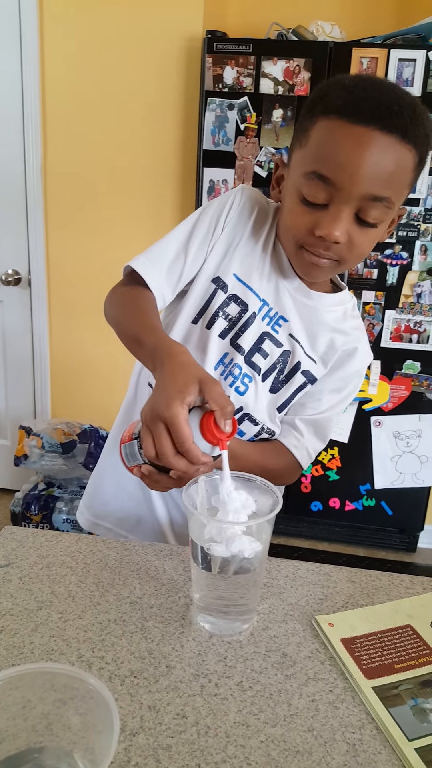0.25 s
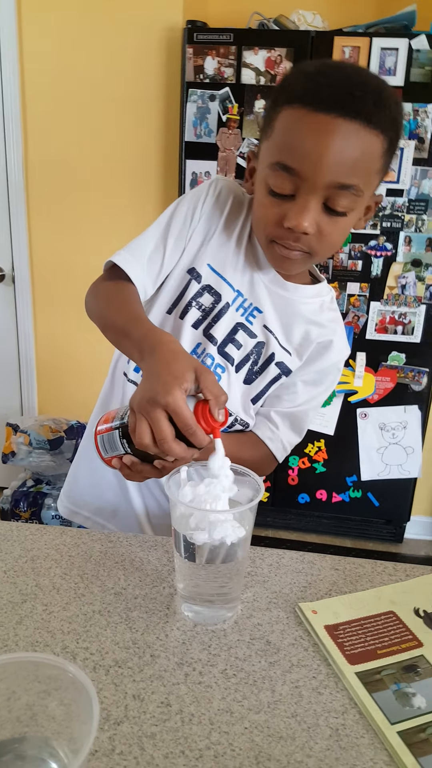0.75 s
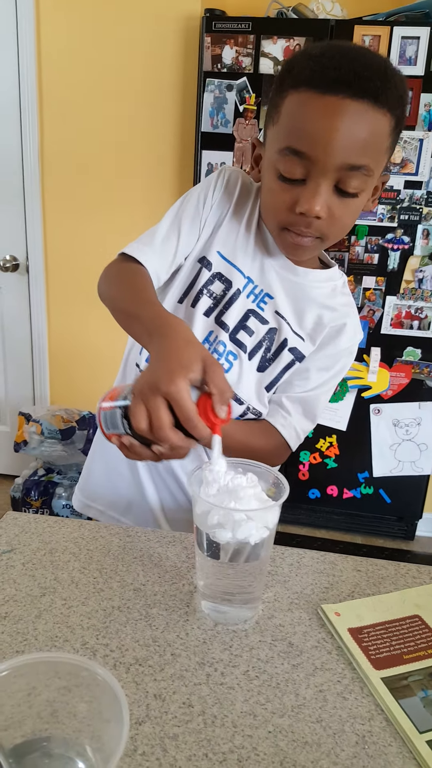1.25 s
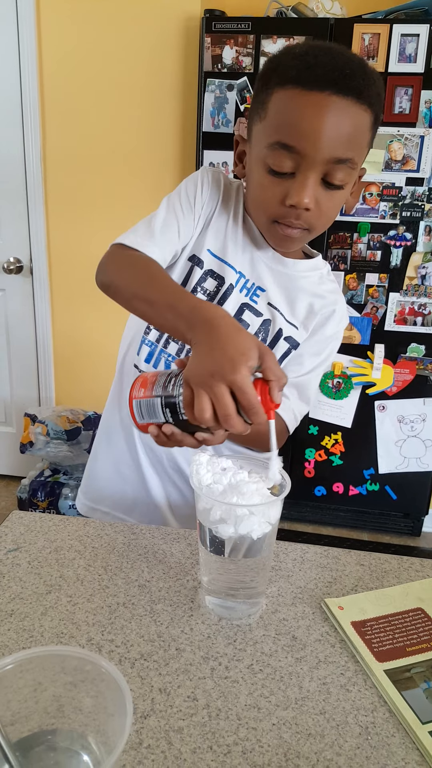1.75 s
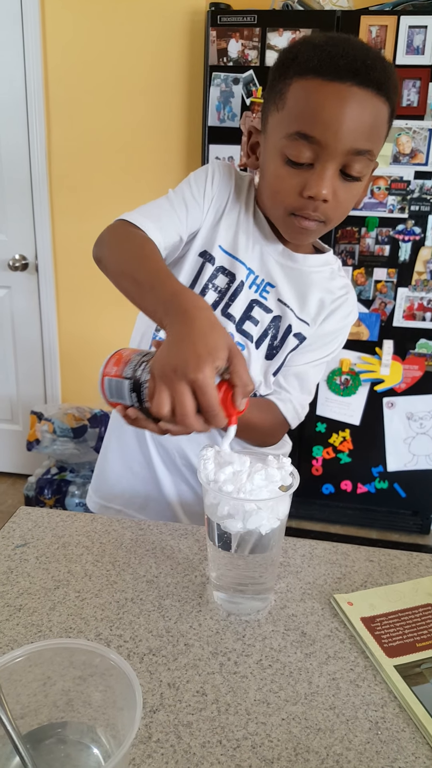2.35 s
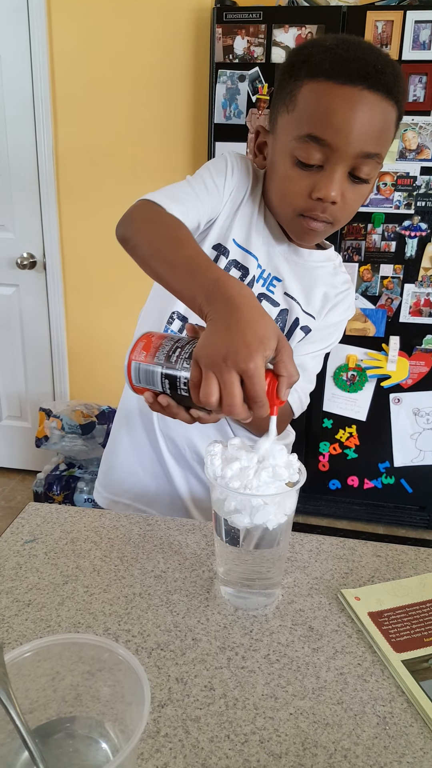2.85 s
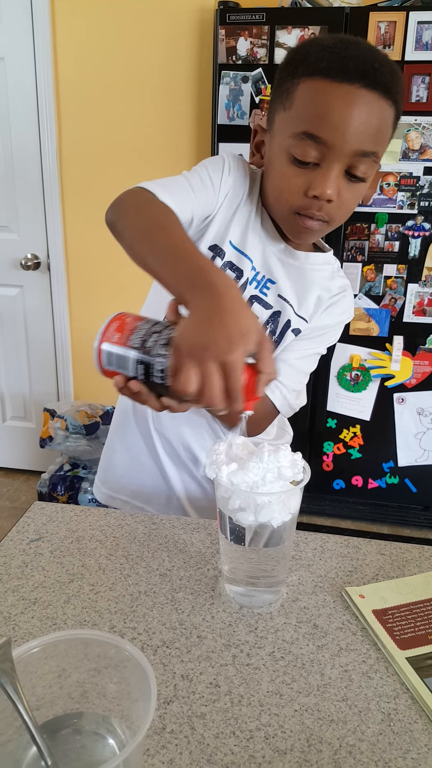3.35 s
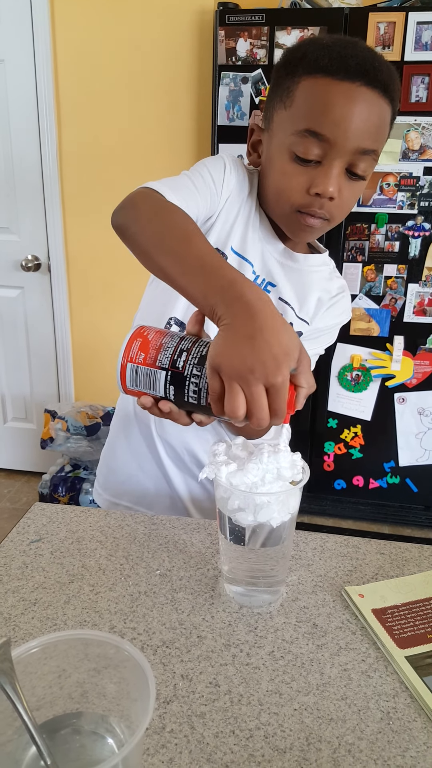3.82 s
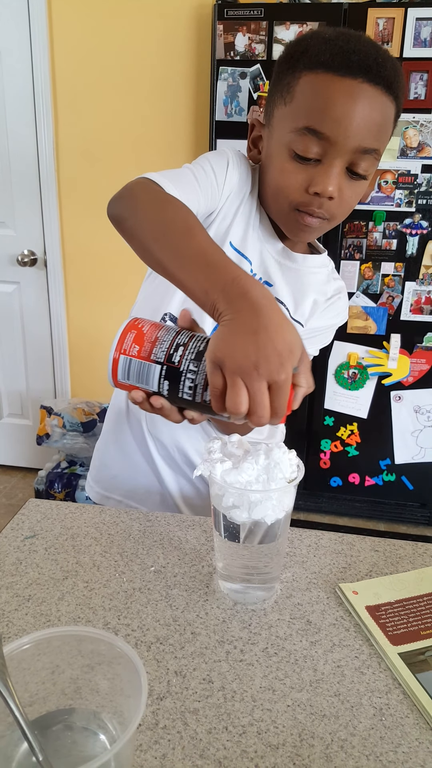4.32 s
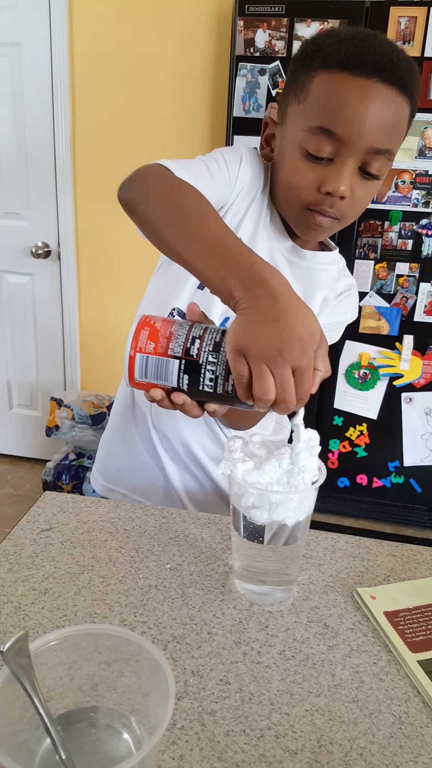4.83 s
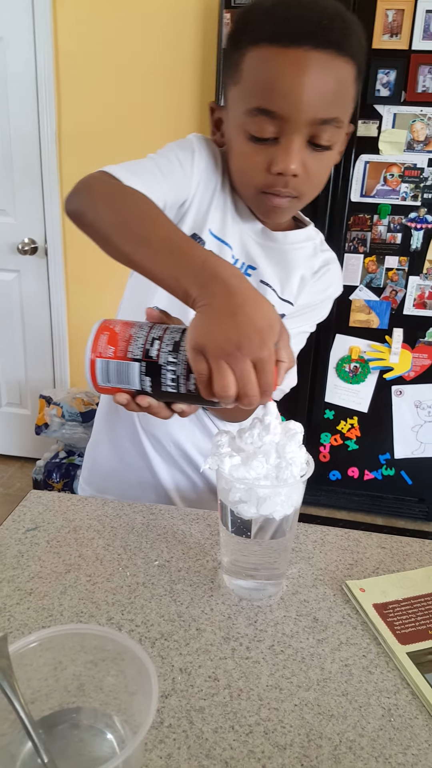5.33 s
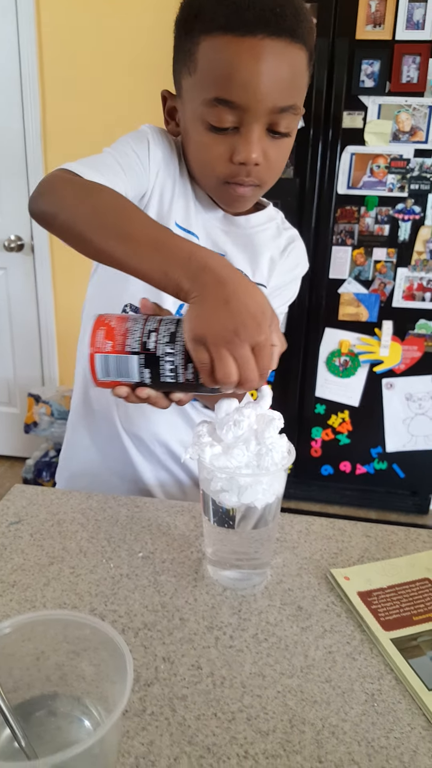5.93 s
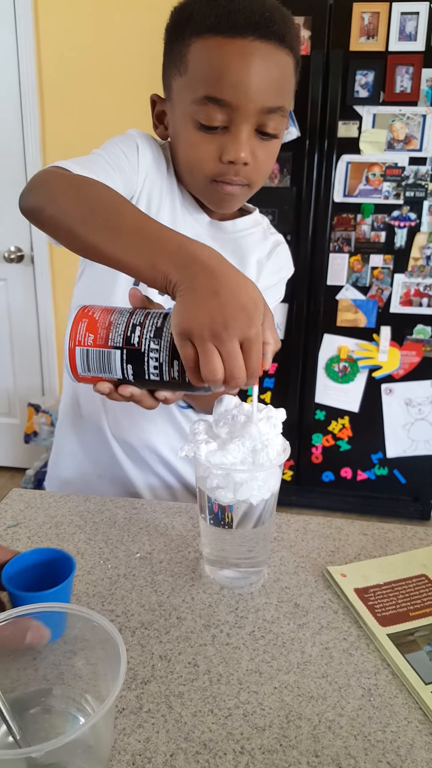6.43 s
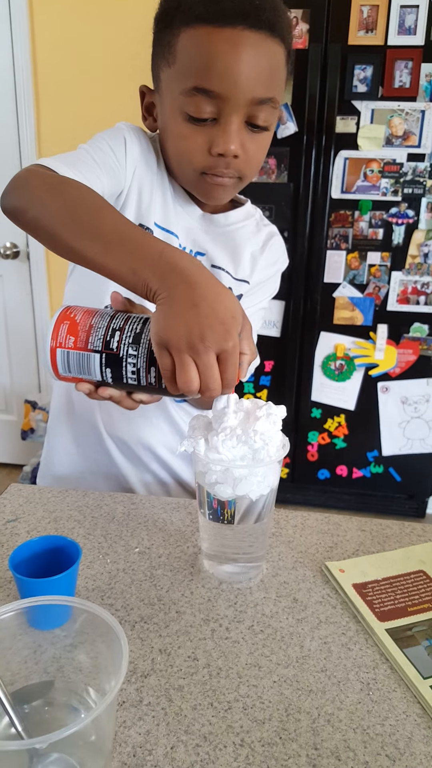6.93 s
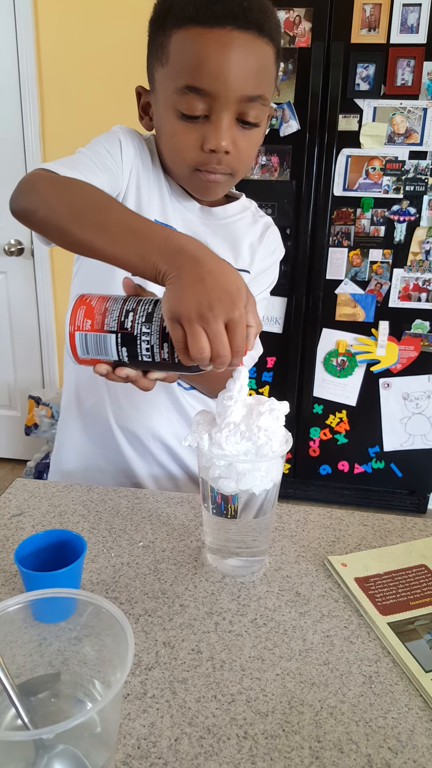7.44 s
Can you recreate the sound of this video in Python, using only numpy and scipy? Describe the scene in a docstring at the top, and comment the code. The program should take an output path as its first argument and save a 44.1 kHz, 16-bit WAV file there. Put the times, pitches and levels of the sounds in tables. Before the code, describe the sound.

A phone at arm's length hears foam spraying steadily into a cup on a stone counter: sputtering hiss, small gas bursts, hollow gurgle. After a brief dip and a drier, gassier stretch in the middle, wet foam returns abruptly. Near the end the jet flares twice while a small plastic cup is softly set down nearby. Low refrigerator rumble and short room reflections surround it.

```python
"""An aerosol can sprays foam into a plastic cup on a stone counter, an arm's length from an upright phone.
From the start flow noise sputters with bursting gas pockets; a higher cup ring joins after 1 s.
At 3.3 s the tilted can turns dry and bright, at 4.2 s foam returns at once.
From 5 s decaying modes and thuds set a small cup down nearby; the jet flares at 3.3, 6.1 and 6.7 s.
Throughout, a refrigerator hums as resonant noise, and counter and walls answer with delays and noise tails."""
import sys
import numpy as np
from scipy import signal
from scipy.fft import rfft, irfft, next_fast_len
from scipy.io import wavfile
from scipy.ndimage import uniform_filter1d, map_coordinates

SR = 44100
rng = np.random.default_rng(int(sys.argv[2]) if len(sys.argv) > 2 else 0)


def inscribe(sig):
    """Save sig as 16-bit PCM at rate SR to the path in sys.argv[1].

    A 1-D sig is mono; a 2-D sig holds one channel per row.
    Samples are clipped to [-1, 1] before scaling.
    """
    pcm = np.round(np.clip(np.atleast_2d(sig).T, -1, 1) * 32767)
    wavfile.write(sys.argv[1], SR, pcm.astype(np.int16))


N = 338688

# Flow, used as departure from each column's mean: (time [s], foam [dB], escaping gas [dB])
FLOW = [(0, -33.5, -40), (.13, -35, -42), (1.0, -31.5, -45), (1.11, -33, -41), (2.01, -33.5, -42),
        (2.19, -37, -45), (2.26, -43, -50.5), (2.43, -42, -50.5), (2.47, -42.5, -45.5),
        (2.72, -35.5, -40.5), (2.9, -33.5, -39), (3.08, -31.5, -48.5), (3.27, -34.5, -42),
        (3.32, -30.5, -36), (3.46, -32, -37.5), (3.66, -35.5, -38.5), (3.85, -34, -39), (4.0, -36.5, -37.5),
        (4.15, -35, -37), (4.24, -31, -38.5), (4.27, -32.5, -41.5), (4.4, -32, -40), (5.28, -32.5, -43),
        (5.45, -28.5, -49), (5.56, -30.5, -48), (5.64, -34, -43.5), (6.18, -31.5, -50.5),
        (6.29, -32.5, -43.5), (6.67, -32.5, -45.5), (6.74, -30, -47.5), (7.04, -32.5, -44.5),
        (7.29, -31.5, -53), (7.5, -33.5, -50), (7.68, -35.5, -52)]
# Largest gas pockets: (time [s], relative level [dB], gas spit re pocket [dB])
POCKETS = [(1.8313, -22.5, -16), (2.452, -29, -18), (3.3543, -34, -16), (4.4987, -26, -12),
           (6.1947, -20, -27.5), (1.4401, -22, -39), (2.033, -30, -5), (3.018, -18.5, -38),
           (3.259, -23, -15), (3.311, -21, -14), (3.923, -23, -15), (4.028, -17, -21), (4.1935, -20, -20),
           (4.386, -26.5, -6), (5.0408, -20, -26), (6.122, -22, -20), (6.549, -18.5, -32),
           (6.729, -19.5, -33), (7.2, -21, -42)]

# Relative spectra of the flow layers, each: (frequency [Hz], density [dB])
GURGLE_SPECTRUM = [(180, -46.5), (300, -19.5), (533, -14.5), (710, -14), (767, -11), (1470, -1.5),
                   (1600, -8), (2080, -52.5), (3520, -120)]
# Air column over the foam: (frequency [Hz], density [dB])
RING_SPECTRUM = [(1000, -29.5), (1400, -8.5), (1720, -4), (1950, -5.5), (2600, -16.5), (5000, -75.5)]
# Wet spray: (frequency [Hz], density [dB])
SPRAY_SPECTRUM = [(1200, -30.5), (1900, -5.5), (2280, -5), (2500, -7), (2900, -3.5), (3300, -5.5),
                  (5000, -45)]
# Jet: (frequency [Hz], density [dB])
JET_SPECTRUM = [(2500, -33.5), (3450, 0.5), (4200, -8), (4900, -8), (5400, -0.5), (8000, -47.5)]
# Dry gas: (frequency [Hz], density [dB])
GAS_SPECTRUM = [(3500, -60.5), (5350, 0), (5850, 8.5), (7200, -0.5), (8600, -3), (9900, -10.5),
                (16000, -36)]
# Orifice whistle and finest hiss: (frequency [Hz], density [dB])
FINE_SPECTRUM = [(6000, -37), (7700, 3.5), (8250, -6.5), (9000, -7), (10000, -10.5), (11600, -11),
                 (13700, -7), (16000, -13)]
# Second, higher ring of the air in the cup: (frequency [Hz], density [dB])
UPPER_SPECTRUM = [(1700, -57.5), (2120, -0.5), (2280, 0), (2420, -5.5), (3000, -48.5)]
SPECTRA = (GURGLE_SPECTRUM, RING_SPECTRUM, SPRAY_SPECTRUM, JET_SPECTRUM,
           GAS_SPECTRUM, FINE_SPECTRUM, UPPER_SPECTRUM)
# Layer balance, rows in the order of SPECTRA: (usual level [dB], foam slope [dB/dB],
# gas slope [dB/dB], change while dry [dB], change as the cup fills [dB/s])
LAYER_BALANCE = [(-41.5, 0.42, 0, -9.5, -.5), (-40.5, 0.7, -0.1, -8.5, 0.46), (-39, 0.91, 0.04, 2, 0.14),
                 (-40, 0.53, 0.35, 0, 0.19), (-42.5, 0.2, 0.95, -3, 0.27), (-44, 0.47, 1.31, 4.5, 1.15),
                 (-42, 1, -0.26, -10, 0)]
# Same order: flow unevenness [1], direct pocket share [1]
ROUGHNESS = (0.57, 0.56, 0.94, 1.43, 1.64, 1.67, 0.71)
POCKET_SHARE = (0.38, 0.59, 0.46, 0.38, 0.26, 0.17, 0.46)
# Air spaces near the nozzle: (frequency [Hz], width [Hz], height [dB])
AIR_SPACES = [(620, 18, 4), (713.5, 13, 8.5), (909.6, 31, 11), (1114, 48, 2.5), (8210, 190, 9)]
# Jet flares: (time [s], nominal rise [dB])
JET_FLARES = [(3.31, 3.5), (6.14, 8.5), (6.72, 9)]
# Jet's brightest band, moving as the can turns: (time [s], centre [Hz], height [dB])
JET_BAND = [(0, 4320, 2), (.85, 4450, 8), (1.15, 4350, 4), (1.4, 4880, 8), (1.7, 4300, 4), (2.15, 4300, 3),
            (2.3, 4670, 11), (2.7, 4700, 6), (3.1, 4250, 6), (3.42, 4090, 7.5), (4.4, 4400, 5.5),
            (6.05, 4150, 5), (6.17, 4650, 5), (6.5, 4140, 2), (6.95, 5070, 4), (7.2, 4480, 5.5),
            (7.68, 4200, -0.5)]
# Cup ring, moving as foam fills it: (time [s], centre [Hz], height [dB])
RING_BAND = [(0, 1330, 4), (.9, 1800, 3.5), (1.4, 1540, 4.5), (2.1, 1760, 3), (5.7, 1710, 4),
             (7.68, 1720, 6.5)]

# Contacts on the counter: (time [s], relative level [dB], thud re contact [dB], softness cut [Hz])
CONTACTS = [(5.036, -23, -32, 750), (6.1361, -21.5, -27, 5000), (6.219, -37, -7, 3000),
            (6.588, -34, -10, 3000)]
# Small cup's modes: (frequency [Hz], relative level [dB], t60 [s])
CUP_MODES = [(220, -13, .03), (400, -10, .03), (600, -3, .035), (788, -1, .05), (865, 0, .05),
             (1107, 7, .06), (1560, 4, .05), (2530, 0, .025)]

# Counter bounce as the can rises and sinks: (time [s], nominal delay [ms], strength [0-1])
COUNTER_BOUNCE = [(0, 0.46, 0.68), (1.35, 0.47, 0.8), (2.6, 0.46, 0.77), (4.0, 0.48, 1), (4.6, 0.47, 1),
                  (5.3, 0.491, 0.87), (5.8, 0.47, 0.89), (7.68, 0.47, 0.99)]
# Cancellations with the bounce: (cycles per nominal delay [1], width [Hz], gain at full strength [dB])
BOUNCE_NOTCHES = [(1.57, 200, -9), (2.47, 250, -8), (3.6, 200, -3), (4.5, 250, -7)]
# Room decay: (frequency [Hz], t60 [s])
ROOM_DECAY = [(300, 0.54), (2000, 0.44), (10000, 0.24)]
# Refrigerator rumble: (frequency [Hz], relative density [dB])
RUMBLE_SPECTRUM = [(15, -28), (40, -22), (97, -20), (140, -4.5), (220, -4.5), (360, -8), (950, -16),
                   (1500, -31), (2600, -70)]
# Cabinet resonances: (frequency [Hz], width [Hz], height [dB])
CABINET = [(76.4, 5.7, 13), (120.7, 2, 11.5), (231, 5.7, 9.5)]
# Rumble's left-right likeness: (frequency [Hz], correlation [1])
LIKENESS = [(60, 1), (250, 0.92), (600, 1), (1200, 0.17)]
# Port colour: (frequency [Hz], left minus right [dB])
PORT_DIFFERENCE = [(100, -0.5), (300, -0.5), (700, -1), (1300, 1.5), (2100, 2), (2900, 2), (4300, -9),
                   (5500, -5), (7000, 1), (8300, -6.5), (9300, -7.5), (11000, -5), (15000, -7)]

DRY_FROM_S, DRY_FULL_S, DRY_UNTIL_S, REWET_S = 3.27, 3.66, 4.225, 0.025
SURGE_RISE_S, SURGE_FADE_S = 0.0028, 0.11  # time constants
UPPER_FROM_S, UPPER_UNTIL_S, UPPER_FADE_S, UPPER_OFF_DB = 1.14, 5.8, 0.18, -22
LARGEST_POCKET, DRY_CALM, PATCHINESS_DB = 3.7, 0.3, 1.1
POP_RING_DB, POP_RING_FOLLOWS_DB_PER_DB = 9, 0.72
JET_BAND_WIDTH_HZ, RING_BAND_WIDTH_HZ = 600, 280
UPPER_DELAY_RATIO, LOWER_DELAY_RATIO, UPPER_STRENGTH_RATIO = 1.445, 0.919, 0.51
KNOCK_ROOM_DB, WALLS_DB = -12, -5.5
HUM_START_DB, HUM_RISE_DB_PER_S = -55, 0.5
TOP_HZ = 15780


def amp(db):
    """Gain of a level in dB."""
    return 10 ** (np.asarray(db) / 20)


def unit(x):
    """x at rms 1."""
    return x / np.sqrt(np.mean(x ** 2) + 1e-20)


def along(points, hz):
    """(Hz, value) points interpolated on a log axis."""
    f, v = np.transpose(points)
    return np.interp(np.log(hz + 1), np.log(f + 1), v)


def curves(rows):
    """One value per sample for each column after the time."""
    s, *cols = np.transpose(rows)
    return [np.interp(np.arange(N) / SR, s, c) for c in cols]


def wobble(knots_per_s):
    """A smooth random curve."""
    return map_coordinates(rng.standard_normal(N // 100), [np.arange(N) * knots_per_s / SR], order=2)


def filtered(x, response):
    """x times a complex response of frequency."""
    m = next_fast_len(N + SR // 2)
    return irfft(rfft(x, m) * response(np.fft.rfftfreq(m, 1 / SR)), m)[..., :N]


def coloured(x, gain, size=4096):
    """x through the minimum-phase filter with this gain of frequency."""
    cepstrum = irfft(np.log(gain(np.fft.rfftfreq(size, 1 / SR)) + 1e-6))
    cepstrum[1:size // 2] *= 2  # fold onto positive time: causal
    cepstrum[size // 2 + 1:] = 0
    return signal.oaconvolve(x, irfft(np.exp(rfft(cepstrum))))[:N]


def peaks(modes, hz):
    """Gain 1 with resonance humps added in power."""
    humps = sum(amp(2 * db) / (1 + (2 * (hz - c) / width) ** 2) for c, width, db in modes)
    return np.sqrt(1 + humps)


def drifting(x, depth_db, bins, frames):
    """Random humps and dips of colour, smoothed over frequency bins and time frames."""
    z = signal.stft(x, nperseg=256)[2]
    field = uniform_filter1d(rng.standard_normal(z.shape), bins, 0)
    for _ in range(2):
        field = uniform_filter1d(field, frames, 1)
    return signal.istft(z * amp(depth_db * unit(field)), nperseg=256)[1][:N]


def nozzle():
    """Turbulent flow, choked on and off by foam, with bursting gas pockets on top."""
    levels_db = voices()
    calm = 1 - DRY_CALM * dryness()  # gas alone flows more evenly
    shared = sputter(per_s=500, spread_db=1.5)
    puff = amp(-60 * np.arange(SR // 50) / SR / 0.0066)  # each burst lets a short puff of gas through
    layers = 0
    for level_db, spectrum, rough, share in zip(levels_db, SPECTRA, ROUGHNESS, POCKET_SHARE):
        pockets = unit(0.73 * shared + sputter(per_s=600, spread_db=3.0))
        flush = unit(signal.oaconvolve(pockets, puff)[:N])
        choke = 0.49 * rough * wobble(14) + 0.69 * wobble(60) + 1.25 * wobble(250)
        flow = unit(amp(calm * rough * choke) * (0.6 + rough * flush) * rng.standard_normal(N))
        gain = lambda hz: amp(along(spectrum, hz)) * peaks(AIR_SPACES, hz)
        layers = layers + amp(level_db) * unit(coloured(flow + share * pockets, gain))
    # random fast flicker of level across frequency
    flickering = drifting(layers, PATCHINESS_DB, bins=6, frames=2)
    return flickering + pops(ring_level_db=levels_db[1])


def voices():
    """Layer levels: foam and gas drive them; the dry spell and the filling cup shift the balance."""
    t = np.arange(N) / SR
    foam_db, gas_db = [c - c.mean() for c in curves(FLOW)]
    dry = dryness()
    gurgle, ring, spray, jet, gas, fine, upper = [
        usual_db + by_foam * foam_db + by_gas * gas_db + dry_db * dry + fill_db_per_s * (t - t.mean())
        for usual_db, by_foam, by_gas, dry_db, fill_db_per_s in LAYER_BALANCE]
    for s, rise_db in JET_FLARES:
        since = np.clip(t - s, 0, None)
        jet = jet + rise_db * (1 - np.exp(-since / SURGE_RISE_S)) * np.exp(-since / SURGE_FADE_S)
    # the upper ring sounds until the foam heaps over the rim
    inside_s = np.minimum(t - UPPER_FROM_S, UPPER_UNTIL_S - t)
    sounding = np.clip(inside_s / UPPER_FADE_S + 0.5, 0, 1)
    return gurgle, ring, spray, jet, gas, fine, upper + UPPER_OFF_DB * (1 - sounding)


def dryness():
    """0 while foam flows, 1 while the tilted can draws mostly gas."""
    times_s = [DRY_FROM_S, DRY_FULL_S, DRY_UNTIL_S, DRY_UNTIL_S + REWET_S]
    return np.interp(np.arange(N) / SR, times_s, [0, 1, 1, 0])


def sputter(per_s, spread_db):
    """Gas pockets bursting at random moments, few large and many small."""
    size = -np.log(rng.random(N) * SR / per_s + 1e-9)  # above zero: a burst, exponentially sized
    return unit((size > 0) * amp(spread_db * np.clip(size, 0, LARGEST_POCKET)))


def pops(ring_level_db):
    """Largest pockets: one push into the spray and the cup, and a decaying spit of gas."""
    push, ring, spit = np.zeros(N), np.zeros(N), np.zeros(N + SR)
    t = np.arange(SR // 50) / SR
    for s, db, spit_db in POCKETS:
        at = round(s * SR)
        push[at] = amp(db)
        # the cup rings more when the flow rings it
        ring[at] = amp(db + POP_RING_FOLLOWS_DB_PER_DB * (ring_level_db[at] - ring_level_db.mean()))
        spit[at:][:len(t)] += amp(db + spit_db - 60 * t / 0.0069) * rng.standard_normal(len(t))

    def shaped(x, db, *spectra):
        """x with the summed gains of the spectra, raised by db."""
        return amp(db) * coloured(x, lambda hz: sum(amp(along(each, hz)) for each in spectra))

    return (shaped(push, 24.9, SPRAY_SPECTRUM, JET_SPECTRUM) + shaped(ring, POP_RING_DB, RING_SPECTRUM)
            + shaped(spit[:N], 16.0, GAS_SPECTRUM, FINE_SPECTRUM))


def knocks():
    """Each contact rings the decaying modes of a plastic cup and thuds the counter."""
    out, t = np.zeros(N + SR), np.arange(SR // 4) / SR
    for s, db, thud_db, soft_hz in CONTACTS:
        ring = 0
        for k, (hz, level_db, t60_s) in enumerate(CUP_MODES):
            decay = amp(level_db + rng.normal(0, 1.0) - 60 * t / t60_s)
            softness = 1 / (1 + (hz / soft_hz) ** 4)  # a soft contact excites less treble
            ring = ring + (-1) ** k * decay * np.sin(2 * np.pi * hz * t) * softness
        ring = ring * (1 - np.exp(-t / 0.0004))
        thud = amp(-60 * t / 0.18) * np.sin(2 * np.pi * 75 * t) * (1 - np.exp(-t / 0.0082))
        out[round(s * SR):][:len(t)] += amp(db + thud_db - 1) * thud - amp(db - 4) * ring
    return out[:N]


def wandering(x):
    """Moving bands: the jet's peak, the cup's ring, and the notches that follow the bounce."""
    hz, t, z = signal.stft(x, SR, nperseg=512)
    at = np.clip(t * SR, 0, N - 1).astype(int)
    bell = lambda centre_hz, width_hz: 1 / (1 + (2 * (hz[:, None] - centre_hz) / width_hz) ** 2)
    delay_ms, strength = [c[at] for c in curves(COUNTER_BOUNCE)]
    jet_hz, jet_db = [c[at] for c in curves(JET_BAND)]
    ring_hz, ring_db = [c[at] for c in curves(RING_BAND)]
    db = jet_db * bell(jet_hz, JET_BAND_WIDTH_HZ) + ring_db * bell(ring_hz, RING_BAND_WIDTH_HZ)
    for cycles, width_hz, depth_db in BOUNCE_NOTCHES:
        db = db + depth_db * strength * bell(1e3 * cycles / delay_ms, width_hz)
    return signal.istft(z * amp(db), SR, nperseg=512)[1][..., :N]


def paths(x):
    """The lower port hears the bounce close behind the direct sound, the upper port later and weaker."""
    def late(hz, delay_s, dull_hz):
        """Delayed path; bounces scatter their treble."""
        return np.exp(-2j * np.pi * hz * delay_s) / np.sqrt(1 + (hz / dull_hz) ** 4)

    direct = lambda hz: late(hz, 0.000016, 30000)
    upper = lambda hz: 1 + 0.26 * late(hz, 0.001714, 2200)
    lower = lambda hz: 0.82 * direct(hz) + 0.091 * late(hz, 0.00299, 3400)
    delay_ms, strength = curves(COUNTER_BOUNCE)
    off_counter = filtered(x, lambda hz: direct(hz) / np.sqrt(1 + (hz / 8000) ** 4))

    def bounce(delay_ratio):
        """Counter reflection with a moving delay."""
        read_at = np.arange(N) - delay_ratio * delay_ms * SR / 1e3
        return strength * map_coordinates(off_counter, [read_at], order=3)

    ports = filtered(x, lambda hz: np.array([upper(hz), lower(hz)]))
    ports = ports + [UPPER_STRENGTH_RATIO * bounce(UPPER_DELAY_RATIO), bounce(LOWER_DELAY_RATIO)]
    # each port's colour drifts slowly and randomly by itself
    return np.array([drifting(port, depth_db=1.0, bins=3, frames=42) for port in ports])


def walls(x):
    """Noise tails, each frequency dying at its own speed; a fresh random tail for each third of a second."""
    out, step, gap = np.zeros((2, N + 2 * SR)), SR // 3, 130  # samples
    for at in range(0, N, step):
        hz, t, z = signal.stft(rng.standard_normal((2, SR // 3)), SR, nperseg=256)
        decay = amp(-60 * t / along(ROOM_DECAY, hz)[:, None])
        tail = signal.istft(z * decay, SR, nperseg=256)[1]
        wet = signal.fftconvolve(x[None, at:at + step], tail / np.linalg.norm(tail[0]), axes=1)
        out[:, at + gap:at + gap + wet.shape[1]] += wet
    return out[:, :N]


def refrigerator():
    """Slowly growing low rumble: noise with cabinet resonances, near mono in the bass."""
    def mid_side(hz):
        """Mid and side gains that give the wanted left-right correlation."""
        turn = np.arccos(np.clip(along(LIKENESS, hz), -1, 1)) / 2
        return amp(along(RUMBLE_SPECTRUM, hz)) * peaks(CABINET, hz) * [np.cos(turn), np.sin(turn)]

    mid, side = filtered(rng.standard_normal((2, N)), mid_side)
    level_db = HUM_START_DB + HUM_RISE_DB_PER_S * np.arange(N) / SR + 0.16 * wobble(2.15)
    return amp(level_db) * unit(np.array([mid + side, mid - side]))


def scene():
    """The can, the knocks, the kitchen and the faint hiss of the microphones."""
    can, taps = nozzle(), knocks()
    # small sources send little bass into the room
    to_room = filtered(can + amp(KNOCK_ROOM_DB) * taps, lambda hz: 1 / np.sqrt(1 + (350 / (hz + 1)) ** 8))
    hiss = amp(-68) * rng.standard_normal((2, N))
    return wandering(paths(can + taps) + amp(WALLS_DB) * walls(to_room)) + refrigerator() + hiss


def record(dry):
    """The two ports differ in colour; deep bass rolls off and nothing passes above TOP_HZ."""
    def response(hz):
        """Half the port difference each way, bass roll-off, band limit."""
        colour = amp(along(PORT_DIFFERENCE, hz) * np.array([[0.5], [-0.5]]))
        bass = 1 / np.sqrt(1 + (62 / (hz + 1)) ** 5)
        return colour * bass * (hz < TOP_HZ)

    return filtered(dry, response)


dry = scene()
out = record(dry)
inscribe(out)
```